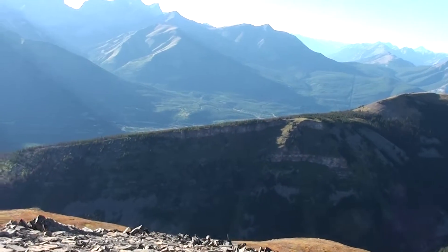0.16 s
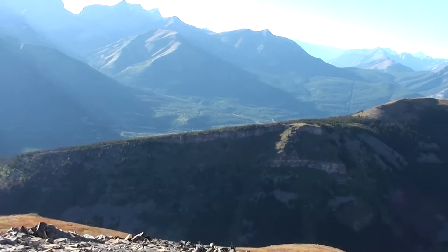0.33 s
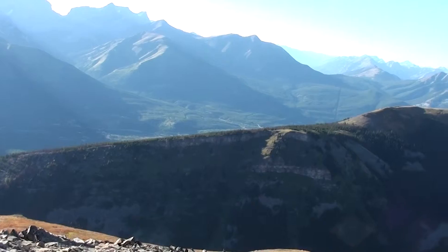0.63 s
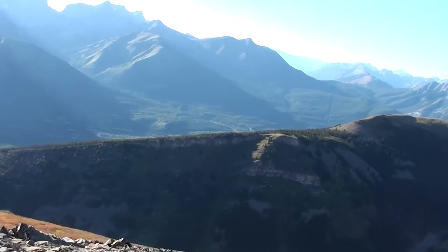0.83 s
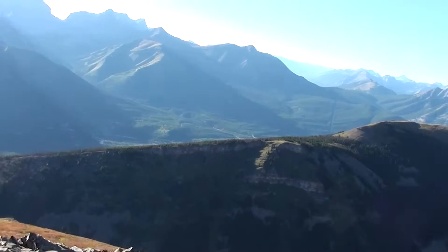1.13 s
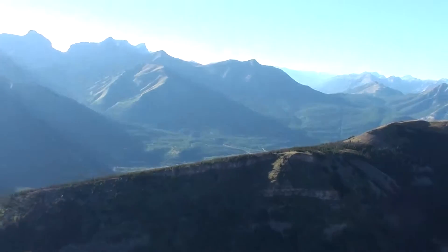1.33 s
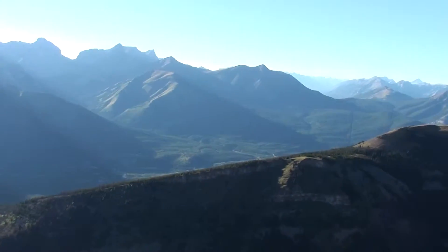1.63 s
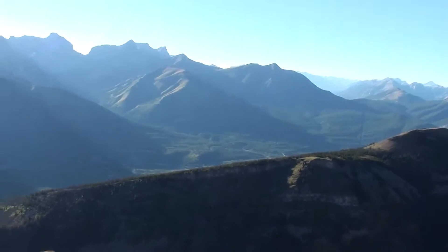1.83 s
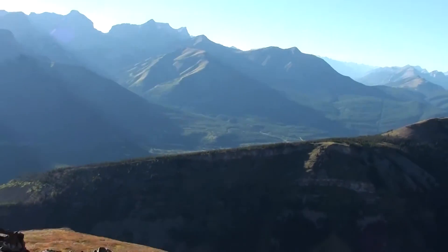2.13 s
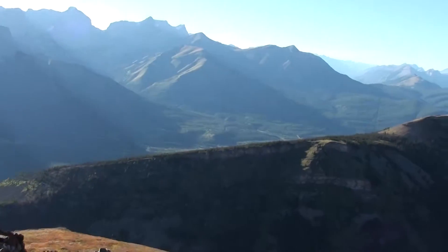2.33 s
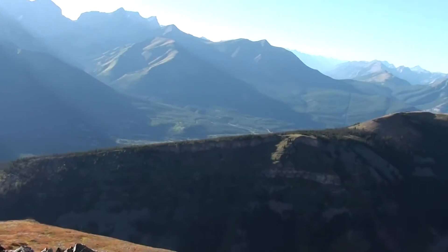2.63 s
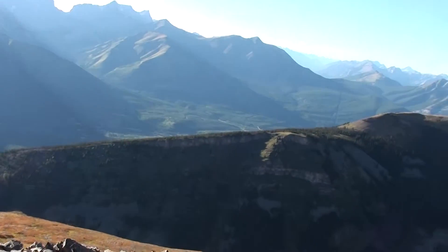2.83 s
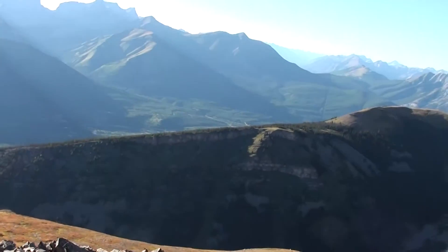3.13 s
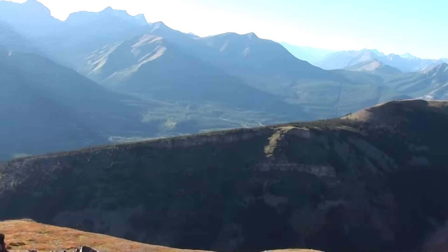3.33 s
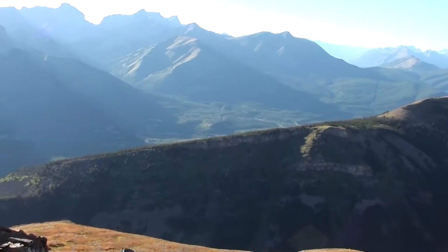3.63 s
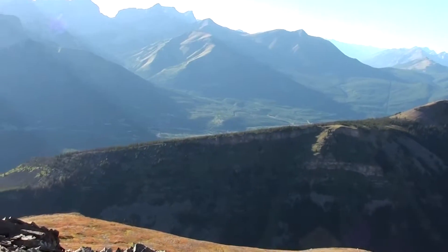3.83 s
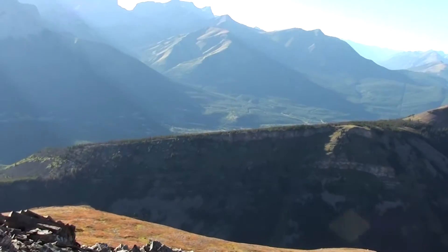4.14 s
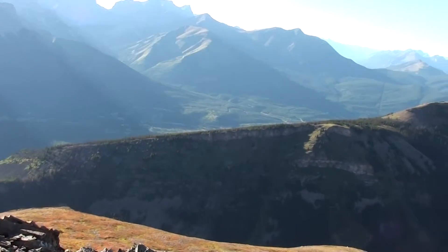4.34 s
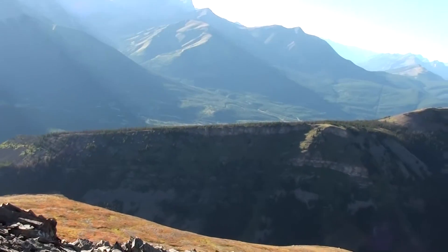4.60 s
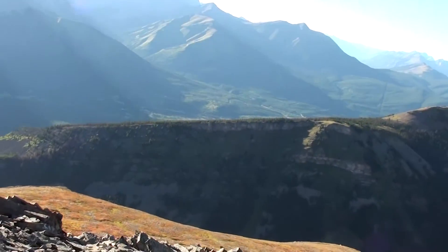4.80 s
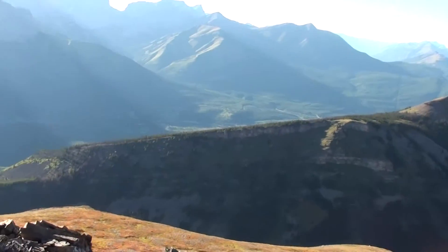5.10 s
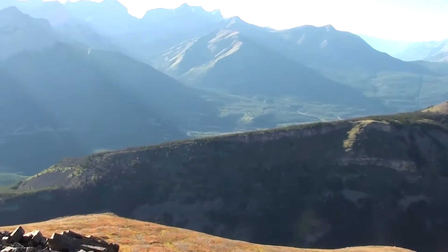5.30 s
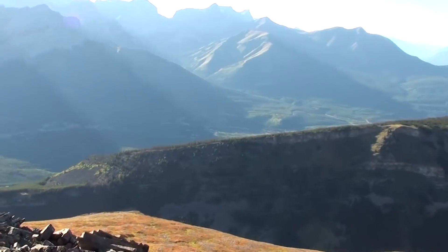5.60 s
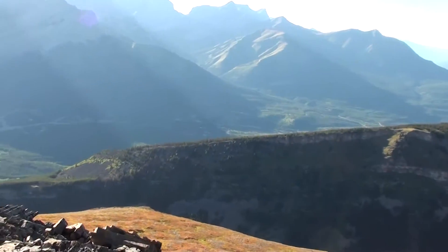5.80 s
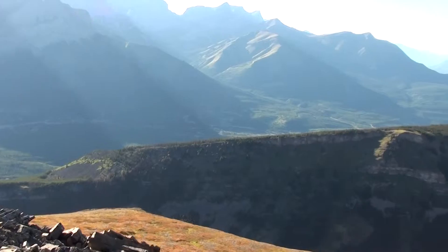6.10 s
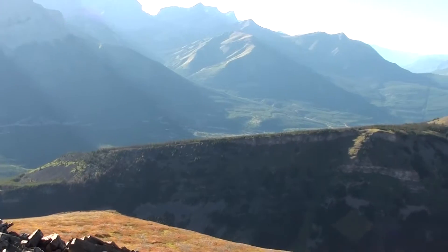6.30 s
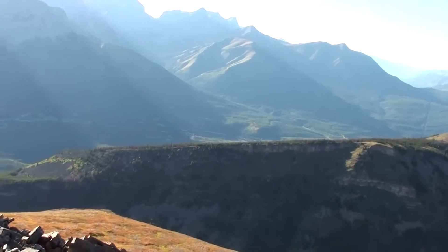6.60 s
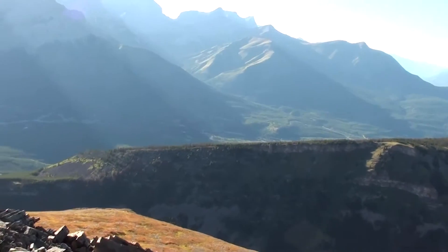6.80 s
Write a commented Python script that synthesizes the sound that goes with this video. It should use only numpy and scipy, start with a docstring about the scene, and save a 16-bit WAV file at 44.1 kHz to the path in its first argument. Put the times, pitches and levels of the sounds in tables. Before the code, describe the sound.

Close stereo sound of boots on loose flaky rock outdoors. A dense, loud crunch and rattle opens, a second burst follows, then evenly spaced steps scrape, knock and tip stones. Thin plates ring for an instant, high and glassy or lower and hollow. Quiet gaps hold a faint airy rush; gentle wind bumps the microphone in low, uneven puffs, most clearly past the middle. No echo.

```python
"""Boots walk over loose flat shale on an open summit, close to a two-port microphone.
Grinding is noise and pings from hundreds of slips a second, gated by slides under the sole.
Knocking stones are short noise bursts and low pings; thin flakes ring as damped sines.
Light wind bumps the ports: lumpy low noise and single eddies over a thin steady rush."""
import sys
import numpy as np
from scipy import signal
from scipy.fft import rfft, irfft, next_fast_len
from scipy.io import wavfile
from scipy.ndimage import uniform_filter1d, map_coordinates

SR = 44100
rng = np.random.default_rng(int(sys.argv[2]) if len(sys.argv) > 2 else 0)


def inscribe(sig):
    """Save sig as 16-bit PCM at rate SR to the path in sys.argv[1].

    A 1-D sig is mono; a 2-D sig holds one channel per row.
    Samples are clipped to [-1, 1] before scaling.
    """
    pcm = np.round(np.clip(np.atleast_2d(sig).T, -1, 1) * 32767)
    wavfile.write(sys.argv[1], SR, pcm.astype(np.int16))


N = 306476

# slides of the sole over the stones: start t/s, length t/s, grit level/dB, rubble level/dB
SLIDES = [(0.0, 0.008, -27.5, -30), (0.049, 0.036, -39, -46.5), (0.134, 0.054, -38, -45),
          (0.213, 0.06, -34.5, -26.5), (0.291, 0.035, -41, -46), (0.361, 0.21, -30.5, -29),
          (0.61, 0.13, -53, -47), (0.786, 0.29, -58.5, -53), (1.147, 0.043, -37.5, -42),
          (1.215, 0.074, -27, -29), (1.332, 0.12, -34, -41), (1.494, 0.022, -39.5, -54),
          (1.576, 0.094, -42.5, -48), (2.236, 0.04, -31.5, -35.5), (2.344, 0.056, -40, -39),
          (2.448, 0.22, -42.5, -46.5), (3.131, 0.096, -34, -34.5), (3.297, 0.043, -38.5, -35),
          (3.399, 0.14, -45, -45), (4.038, 0.053, -33, -38), (4.118, 0.1, -46, -43), (4.32, 0.15, -46, -44),
          (4.974, 0.23, -44.5, -46), (5.78, 0.018, -40.5, -45), (5.911, 0.037, -28.5, -39),
          (6.015, 0.049, -34, -42), (6.117, 0.085, -44, -46), (6.288, 0.052, -34, -33),
          (6.448, 0.086, -44.5, -42)]
RISE_DB_PER_S, FALL_DB_PER_S = 1104, 403
# bright grinding and cracks, relative density: f/Hz, level/dB per Hz
GRIT_SPECTRUM = [(1500, -9.5), (3000, -3), (5000, 3.5), (7700, 1), (16000, -29.5)]
# dull stone body, relative density: f/Hz, level/dB per Hz
RUBBLE_SPECTRUM = [(60, -57), (250, -9), (600, -5.5), (1300, -6), (2200, -4.5), (4000, -39)]
# stone on stone, relative levels: t/s, crack level/dB, knock level/dB
CLACKS = [(0.099, -7, -16.5), (0.113, -17, -32), (0.23, -22, -10), (0.253, -9.5, -22), (0.261, -13, -25),
          (0.27, -20, -16), (0.291, -17, -38), (0.352, -10.5, -9), (0.368, -12.5, -29), (0.401, -11, -27),
          (0.434, -4.5, -22), (0.447, -7, -23), (0.453, -5.5, -27), (0.545, -11, -1.5), (0.559, -21, -5.5),
          (0.583, -31, -24), (0.626, -10.5, -13), (0.637, -21, -43), (0.653, -30, -17), (0.7, -18, -13),
          (0.705, -24.5, -25), (0.713, -19.5, -25), (0.783, -13, -15.5), (0.849, -37, -16),
          (0.88, -33, -28.5), (0.939, -32, -22), (0.952, -23.5, -19), (1.148, -24.5, -11),
          (1.166, -31, -27), (1.18, -16, -13), (1.205, -17.5, -18), (1.236, -23, -46), (1.251, -5.5, -11),
          (1.262, -17, -29), (1.284, -7.5, -8.5), (1.302, -18, -23), (1.315, -15, -18), (1.339, -5.5, -47),
          (1.346, -10.5, -37), (1.395, -11.5, -12), (1.427, -8.5, -40), (1.504, -22, -27.5),
          (2.182, -19, -15), (2.225, -40, -15.5), (2.243, -16.5, -15), (2.259, -15, -11.5),
          (2.277, -36, -9), (2.341, -19, -17), (2.375, -14.5, -17), (2.391, -17, -38), (2.412, -19, -16),
          (2.439, -23, -12.5), (2.47, -14, -14.5), (2.482, -14.5, -18), (2.564, -15, -22),
          (2.628, -13.5, -6.5), (2.633, -12, -11), (3.124, -16, -14.5), (3.138, -14.5, -4),
          (3.181, -9.5, 0), (3.209, -12.5, -11), (3.231, -16, -29), (3.274, -19, -20), (3.301, -10, -6),
          (3.318, -15.5, -2.5), (3.405, -28.5, -11.5), (3.428, -21.5, -6), (3.469, -21, -24),
          (3.476, -17.5, -12), (3.503, -9.5, -28), (3.528, -30, -11.5), (3.609, -31, -11.5),
          (3.688, -36, -23.5), (3.729, -41, -19), (3.83, -26.5, -28), (3.981, -18.5, -19.5),
          (3.998, -27, -22), (4.028, -13, -15), (4.038, -13.5, -34), (4.056, -34, -24), (4.087, -20.5, -22),
          (4.279, -34, -11.5), (4.302, -12, -12), (4.334, -8, -7.5), (4.374, -19, -10),
          (4.416, -27.5, -12.5), (5.007, -28, -18.5), (5.061, -20, -16.5), (5.119, -10, -18.5),
          (5.186, -12.5, -18), (5.237, -25, -21), (5.398, -28.5, -30), (5.417, -30, -21.5),
          (5.769, -13.5, -19.5), (5.776, -12, -24), (5.797, -24, -38), (5.905, -15.5, -21),
          (5.926, -8.5, -35), (5.931, -6.5, -12), (5.956, -13, -39), (6.001, -5.5, -23), (6.042, -9, -53),
          (6.06, -20, -52), (6.101, -23, -16.5), (6.114, -22, -24), (6.125, -19, -46), (6.152, -24, -43),
          (6.303, -12.5, -10), (6.335, -10, -10.5), (6.384, -33, -10.5), (6.449, -28, -27),
          (6.501, -27, -32)]
# flakes free to ring: t/s, level/dB, f/Hz, t60/s
CLINKS = [(0.291, -28.5, 4620, 0.09), (0.785, -11, 1014, 0.01), (1.276, -23, 6600, .04),
          (1.329, -23, 5900, 0.045), (1.427, -17, 8530, 0.066), (1.427, -28, 2130, .05),
          (1.503, -26.5, 2240, 0.035), (1.635, -28.5, 4640, 0.094), (1.659, -29, 8010, 0.074),
          (1.659, -27.5, 4720, 0.05), (2.183, -7, 1870, 0.014), (2.242, -17.5, 1363, 0.063),
          (2.275, -15.5, 1364, 0.036), (2.342, -30, 2530, 0.11), (2.375, -15.5, 6160, 0.081),
          (2.392, -9.5, 4510, 0.051), (2.39, -19.5, 3160, 0.076), (2.375, -13, 3170, 0.035),
          (2.392, -23, 2520, 0.13), (2.439, -15, 1180, 0.026), (2.634, -5.5, 1717, 0.038),
          (2.634, -21, 1356, .06), (3.125, -11, 4810, 0.022), (3.125, -7.5, 1360, 0.022),
          (3.231, -21, 6900, 0.052), (3.409, -25, 4840, 0.026), (3.428, -12.5, 1100, 0.019),
          (3.611, -20, 1043, 0.017), (4.039, -7, 7840, 0.039), (4.037, -12.5, 2340, 0.024),
          (4.043, -7, 6200, 0.016), (4.131, -21, 1364, 0.086), (4.157, -17.5, 1356, 0.048),
          (4.156, -21.5, 2080, 0.052), (4.335, -19.5, 2520, 0.12), (4.333, -8.5, 7480, 0.025),
          (4.338, -19.5, 4410, 0.09), (4.339, -23.5, 1174, 0.09), (5.121, -20.5, 1470, 0.04),
          (5.775, -25, 2000, 0.06), (5.776, -21, 2870, 0.037), (5.932, -26, 3010, 0.046),
          (6.058, -29, 4500, 0.064), (6.045, -32, 2900, .07), (6.045, -11.5, 6750, 0.033),
          (6.059, -13, 5380, 0.061), (6.124, -25.5, 2970, 0.035), (6.127, -14.5, 6660, 0.034)]
# one thin plate that rings step after step: t/s, level/dB
PLATE = [(2.245, -28), (2.262, -25.5), (3.138, -22.5), (3.233, -27), (3.319, -25), (3.527, -31.5),
         (3.687, -34.5), (4.337, -16), (4.447, -42), (4.474, -36.5)]
PLATE_HZ, PLATE_T60_S = 3700, 0.065
# partials of a faint high double tone, perhaps a small metal tag: f/Hz, relative level/dB
TINK_PARTIALS = [(9670, -1), (9300, -7)]
TINK_T60_S = 0.12
# strikes of the double tone: t/s, level/dB
TINKS = [(2.733, -42.5), (4.473, -35.5), (4.988, -42), (5.101, -32)]
# gain of the ground scatter to the sides: f/Hz, level/dB
SCATTER = [(1200, -26), (5000, -22), (13000, -26)]
# wind rumble before its random lumps: t/s, level/dB
BREEZE = [(0.0, -58.5), (1.3, -54.5), (2.5, -64), (2.7, -46.5), (3.1, -48.5), (3.9, -43.5), (4.2, -53),
          (4.85, -54.5), (5.15, -38), (5.38, -62), (5.55, -33), (5.85, -62), (6.5, -45), (6.95, -46.5)]
# eddies on the ports: t/s, level/dB
PUFFS = [(2.62, -31), (2.775, -32.5), (3.624, -27), (3.936, -21), (4.066, -28), (4.963, -30.5),
         (5.095, -16), (5.181, -24.5), (5.223, -25), (5.278, -22), (5.52, -24.5), (5.583, -39),
         (6.343, -27.5), (6.879, -26.5)]
# wind rumble, relative density: f/Hz, level/dB per Hz
RUMBLE_SPECTRUM = [(15, -44), (30, -1), (120, 5), (200, -3), (500, -52)]
# eddies, relative density: f/Hz, level/dB per Hz
EDDY_SPECTRUM = [(40, -16.0), (110, 5.0), (180, 0), (400, -13), (900, -69)]
# wind pressure on the two ports: f/Hz, left-right correlation
PORT_LIKENESS = [(40, 1), (150, 0.6), (300, 0.45)]
# far wind and microphone hiss, relative density: f/Hz, level/dB per Hz
AIR_SPECTRUM = [(150, -4), (550, -9.5), (1700, -19), (3900, -22.5), (6900, -20.5), (15600, -30.5),
                (16000, -45)]
# far wind and hiss: f/Hz, left-right correlation
AIR_LIKENESS = [(300, 0.79), (3000, 0.53), (12000, 1)]
TOP_HZ = 16600  # band limit of the input stage


def crunch():
    """Load drives hundreds of small slips a second, a few much larger; each chip pings at its own pitch."""
    slips = 2600
    when, size, tilt, pitch = rng.random((slips, 4)).T
    times_s = when * N / SR
    slip_db = -3 * np.log(size + 0.07)
    tilt_db = 5 * tilt  # brighter slips carry less rubble
    grit = bursts(times_s, slip_db + tilt_db, GRIT_SPECTRUM, t60_s=0.012, attack_s=0.0004, bed=0.4)
    chip_hz = 2600 * 3.5 ** pitch
    chip_t60_s = 0.075 * (0.21 + tilt)
    grit += pings(times_s, slip_db - 4.5, chip_hz, chip_t60_s)
    rubble = bursts(times_s, slip_db - tilt_db, RUBBLE_SPECTRUM, t60_s=0.016, attack_s=0.0008, bed=0.2)
    grit_gain, rubble_gain = load()
    return grit_gain * unit(grit) + rubble_gain * unit(rubble)


def load():
    """Gains of grit and rubble: each slide rises fast, holds, and trickles out."""
    start_s, length_s, *levels_db = np.transpose(SLIDES)[..., None]
    t = np.arange(N) / SR
    rise_db = -RISE_DB_PER_S * np.maximum(start_s - t, 0)
    fall_db = -FALL_DB_PER_S * np.maximum(t - start_s - length_s, 0)
    return [amp(db + rise_db + fall_db).sum(axis=0) for db in levels_db]


def clacks():
    """Each contact snaps, cracks bright and knocks duller; the larger stone sings at its own pitch."""
    s, crack_db, knock_db = np.transpose(CLACKS)
    pitch, life = rng.random((len(s), 2)).T
    snap = bursts(s, crack_db + 2.5, GRIT_SPECTRUM, t60_s=0.0072, attack_s=0.00032)
    crack = bursts(s, crack_db, GRIT_SPECTRUM, t60_s=0.021, attack_s=0.0054)
    knock = bursts(s, knock_db + 2.5, RUBBLE_SPECTRUM, t60_s=0.012, attack_s=0.0024)
    slab_hz = 900 * 1.85 ** pitch
    slab = pings(s, knock_db - 9.5, slab_hz, 0.03 * (0.53 + life))
    return snap + crack + knock + slab


def clinks():
    """Damped tones of thin flakes, plate and double tone; phase drifts a little as they rock."""
    plate = [(s, db, PLATE_HZ, PLATE_T60_S) for s, db in PLATE]
    tinks = [(s, db + tone_db, hz, TINK_T60_S) for s, db in TINKS for hz, tone_db in TINK_PARTIALS]
    s, db, hz, t60_s = np.transpose(list(CLINKS) + plate + tinks)[..., None]
    t = np.arange(5000) / SR
    drift_rad = 0.025 * np.cumsum(rng.standard_normal((len(s), len(t))), axis=1)
    tones = np.sin(2 * np.pi * hz * t + drift_rad)
    return placed(s[:, 0], amp(db) * tones * fade(t, t60_s, attack_s=0.00015))


def bursts(times_s, db, spectrum, t60_s, attack_s, bed=0):
    """Short dying puffs of coloured noise, one per contact, on a steady bed."""
    puff = fade(np.arange(1500) / SR, t60_s, attack_s)
    shape = bed + placed(times_s, amp(db)[:, None] * puff)
    stones = mottled(depth_db=3.8)
    colour = lambda x: filtered(x, lambda hz: amp(along(spectrum, hz)))
    return colour(shape * stones) / np.std(colour(stones))


def pings(times_s, db, hz, t60_s):
    """One damped tone per contact."""
    t = np.arange(1500) / SR
    tones = np.sin(2 * np.pi * hz[:, None] * t)
    return placed(times_s, amp(db)[:, None] * tones * fade(t, t60_s[:, None], attack_s=0.0016))


def mottled(depth_db):
    """Noise whose colour changes every few milliseconds, as no two stones sound alike."""
    z = signal.stft(rng.standard_normal(N), nperseg=128)[2]
    field = uniform_filter1d(rng.standard_normal(z.shape), size=2, axis=0)  # over frequency
    field = uniform_filter1d(field, size=6, axis=1)  # over time
    return signal.istft(z * amp(depth_db * unit(field)), nperseg=128)[1][:N]


def ground_scatter(stones):
    """Rough ground returns a short dense noise tail to the sides, most in the low treble."""
    t = np.arange(900) / SR
    tail = rng.standard_normal(len(t)) * fade(t, 0.016, attack_s=0.0026)
    tail = unit(tail) / np.sqrt(len(t))  # unit energy
    return filtered(signal.fftconvolve(stones, tail)[:N], lambda hz: amp(along(SCATTER, hz)))


def wind():
    """Lumpy rumble and single eddies, partly different on each port, over a thin steady rush."""
    s, db = np.transpose(PUFFS)[..., None]
    t = np.arange(3000) / SR
    eddies = placed(s[:, 0], amp(db) * fade(t, 0.14, attack_s=0.0019))
    breeze_db = curves(BREEZE)[0]
    lumps = amp(breeze_db + 2.4 * wobble(rate_hz=24))
    rumble = lumps * rush(RUMBLE_SPECTRUM, PORT_LIKENESS)
    gusts = eddies * rush(EDDY_SPECTRUM, PORT_LIKENESS)
    return rumble + gusts + amp(-49.5) * rush(AIR_SPECTRUM, AIR_LIKENESS)


def rush(spectrum, alike):
    """Stereo noise of rms 1; the mid-side split sets the left-right correlation."""
    def split(hz):
        angle = np.arccos(np.clip(along(alike, hz), -1, 1)) / 2
        return amp(along(spectrum, hz)) * [np.cos(angle), np.sin(angle)]
    mid, side = filtered(rng.standard_normal((2, N)), split)
    return unit(np.array([mid + side, mid - side]))


def wobble(rate_hz):
    """Smooth random curve, rate_hz knots a second."""
    knots = rng.standard_normal(int(N * rate_hz / SR) + 4)
    return map_coordinates(knots, [np.arange(N) * rate_hz / SR])


def amp(db):
    """Gain of a level in dB."""
    return 10 ** (np.asarray(db) / 20)


def unit(x):
    """x brought to rms 1."""
    return x / np.sqrt(np.mean(x ** 2) + 1e-20)


def along(points, hz):
    """(Hz, value) points interpolated on a log axis."""
    f, v = np.transpose(points)
    return np.interp(np.log(hz + 1), np.log(f + 1), v)


def curves(rows):
    """One value per sample for each column after the time."""
    s, *cols = np.transpose(rows)
    return [np.interp(np.arange(N) / SR, s, c) for c in cols]


def filtered(x, response):
    """x times a response of frequency."""
    m = next_fast_len(N + 8192)
    return irfft(rfft(x, m) * response(np.fft.rfftfreq(m, 1 / SR)), m)[..., :N]


def placed(times_s, waves):
    """Sum of the rows of waves, each starting at its time."""
    starts = np.round(np.asarray(times_s) * SR).astype(int)
    at = starts[:, None] + np.arange(waves.shape[1])
    return np.bincount(at.ravel(), waves.ravel(), N)[:N]


def fade(t, t60_s, attack_s):
    """Short rise, then exponential fall."""
    return (1 - np.exp(-t / attack_s)) * amp(-60 * t / t60_s)


def scene():
    """Stones almost straight below, slightly left; scatter in opposite phase on the sides; wind."""
    stones = crunch() + clacks() + clinks()
    side = ground_scatter(stones)
    pan_db = [[0.4], [-0.4]]
    return stones * amp(pan_db) + [side, -side] + wind()


def record(dry):
    """Input stage: rounds off the highest peaks, keeps nothing above its band limit."""
    rounded = dry / (1 + np.abs(dry / 0.75) ** 6) ** (1 / 6)
    return filtered(rounded, lambda hz: hz < TOP_HZ)


dry = scene()
out = record(dry)
inscribe(out)
```